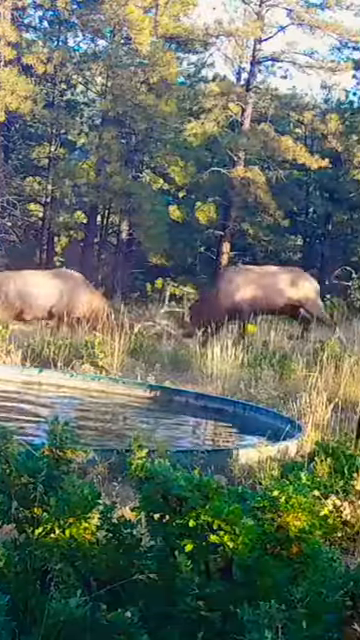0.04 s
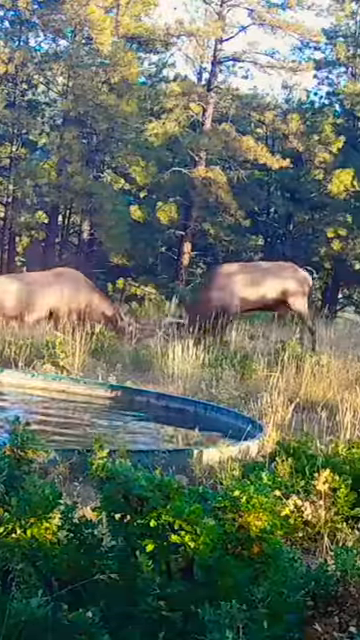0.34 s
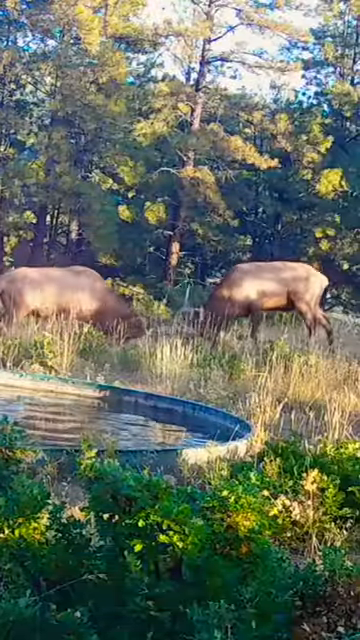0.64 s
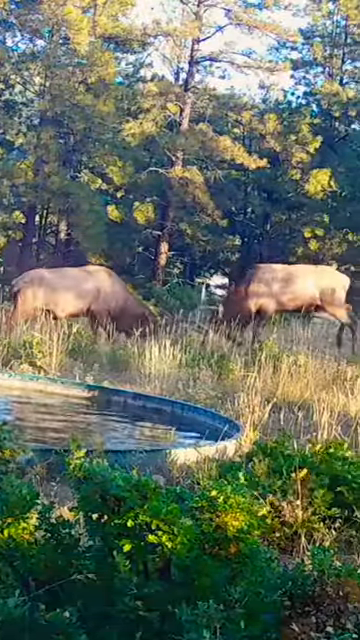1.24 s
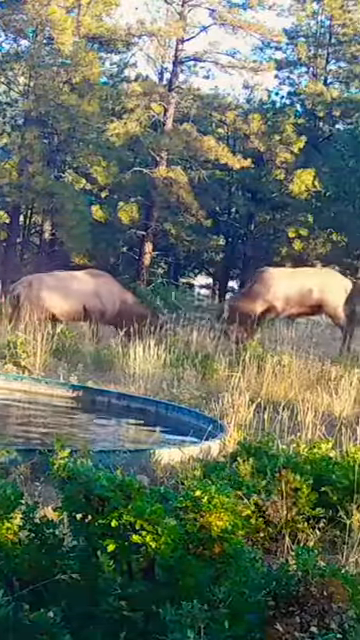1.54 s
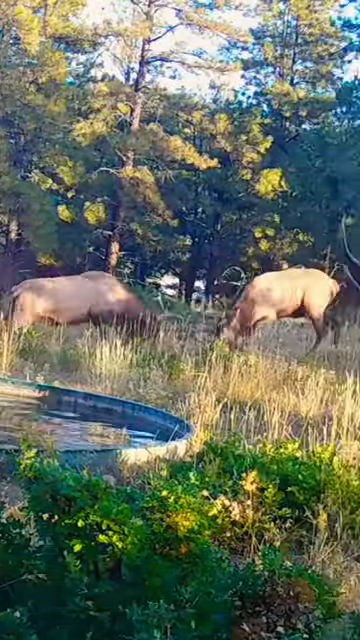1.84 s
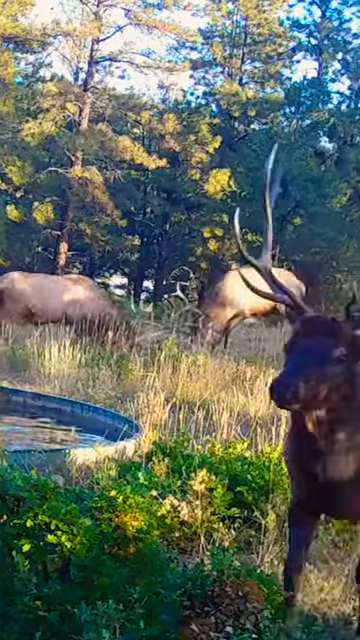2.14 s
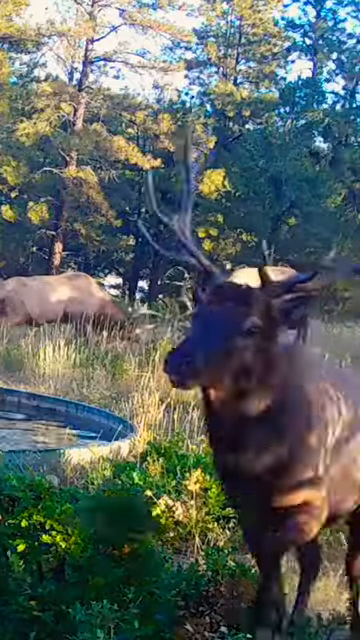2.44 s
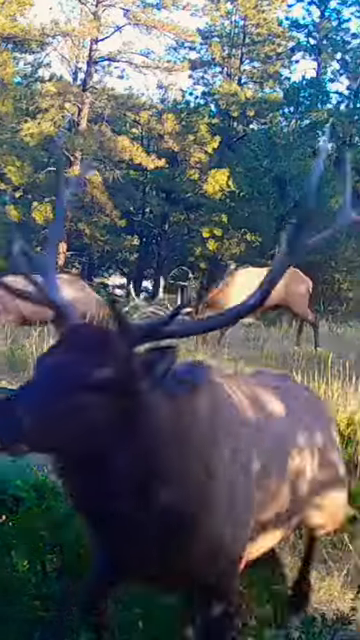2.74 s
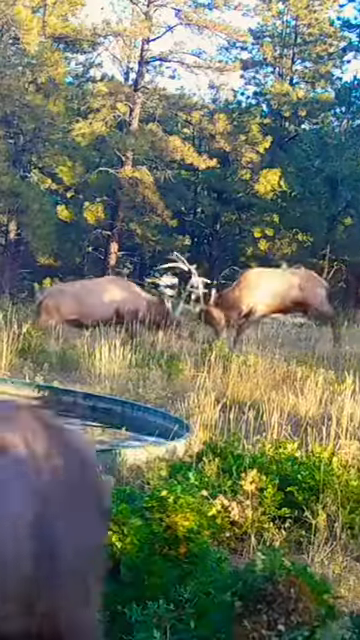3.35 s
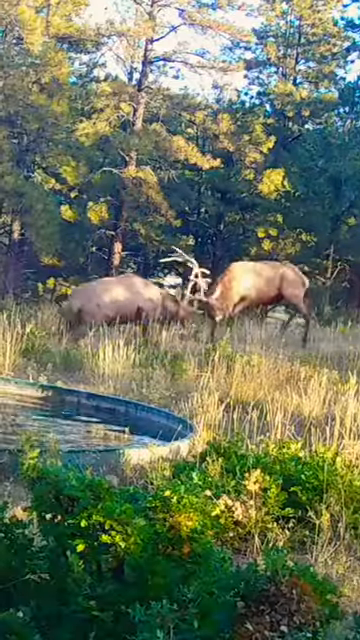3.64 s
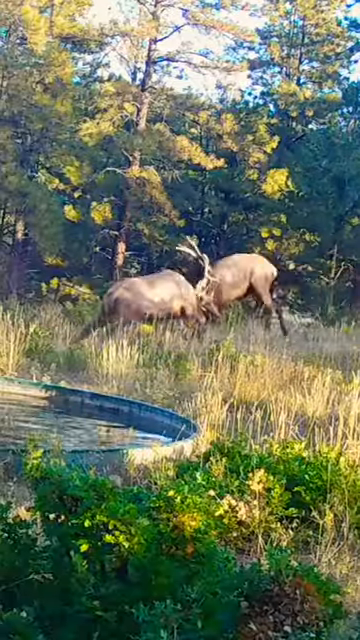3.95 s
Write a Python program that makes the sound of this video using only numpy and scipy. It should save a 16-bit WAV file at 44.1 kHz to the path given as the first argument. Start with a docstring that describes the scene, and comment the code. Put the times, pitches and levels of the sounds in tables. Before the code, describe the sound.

An elk's piercing, hoarse bugle, then distant squeals, clacking antlers and footsteps through brush.

```python
"""A piercing whistle steps down over a hoarse roar and collapses: a bull elk bugles in a forest clearing.
Irregular vocal folds drive his throat and mouth resonances and shake the whistle; the trees echo it.
Sparring bulls farther off squeal and knock antlers, which ring at each contact.
Another walks past with crackling brush and soft hoof thuds. Under it all: still air, a faint low hum."""
import sys
import numpy as np
from scipy import signal
from scipy.fft import rfft, irfft
from scipy.io import wavfile
from scipy.ndimage import map_coordinates

SR = 44100
rng = np.random.default_rng(int(sys.argv[2]) if len(sys.argv) > 2 else 0)


def transcribe(signal):
    """Save signal, clipped to [-1, 1], as a 16-bit WAV file at the path in sys.argv[1]."""
    frames = np.atleast_2d(signal).T
    limited = np.clip(frames, -1, 1)
    pcm = np.round(limited * 32767).astype(np.int16)
    wavfile.write(sys.argv[1], SR, pcm)


N = 176400
TIME_S = np.arange(N) / SR

# Whistle registers; CRACK is the high one giving way: time_s, pitch_hz, h1_db, h2_db, h3_db (harmonics)
WHISTLE_HIGH = [(0, 1922, -15, -27, -45), (.04, 1900, -43, -52, -31), (.066, 1904, -27.5, -25.5, -32),
                (.086, 1946, -17, -23, -25), (.115, 1961, -18, -20.5, -37.5), (.2, 1937, -15.5, -20, -29.5),
                (.285, 1926, -28, -22.5, -26.5), (.335, 1857, -27, -43, -35), (.44, 1827, -33, -37, -29.5),
                (.53, 1866, -25, -41.5, -37.5), (.59, 1850, -30, -41, -35.5), (.62, 1950, -30, -42, -35)]
WHISTLE_CRACK = [(.562, 1828, -45, -44, -38), (.586, 1873, -32, -28, -24), (.605, 2000, -37, -34, -45),
                 (.622, 1960, -38, -35, -47)]
WHISTLE_MIDDLE = [(.57, 1714, -27.5, -61, -54), (.605, 1722, -19.5, -34, -46), (.64, 1718, -14.5, -23, -44),
                  (.675, 1718, -14, -21, -48), (.72, 1698, -15, -19, -46), (.79, 1700, -14.5, -20, -39),
                  (.818, 1669, -18.5, -19.5, -44), (.834, 1562, -13, -31, -39), (.843, 1575, -30, -52, -42)]
WHISTLE_RELAPSE = [(0.835, 1847, -43, -65, -38), (0.855, 1847, -32.5, -47, -29),
                   (0.905, 1833, -46, -50, -36)]
WHISTLE_LOW = [(0.832, 1476, -18.5, -50, -56), (.865, 1471, -27, -56, -60), (.892, 1466, -23, -63, -58),
               (0.909, 1455, -10, -26.5, -35), (.935, 1450, -9.5, -25, -34.5),
               (0.984, 1453, -12.5, -30.5, -38), (1.014, 1486, -14, -34, -34), (1.044, 1499, -29, -41, -60),
               (1.089, 1438, -22.5, -36, -44), (1.13, 1485, -28, -42, -55)]
WHISTLE_COLLAPSE = [(1.118, 1150, -28, -47, -52), (1.131, 1090, -16, -48, -48),
                    (1.135, 1060, -22, -50, -50), (1.139, 1040, -14.5, -52, -48),
                    (1.147, 1010, -14.5, -52, -48), (1.152, 790, -29, -46, -46),
                    (1.156, 620, -16.5, -31, -50), (1.165, 575, -17, -19.5, -48),
                    (1.169, 440, -28, -33, -51), (1.184, 345, -30, -33, -56), (1.195, 300, -44, -48, -63)]
# Spectrum of the whistle's high overtones: freq_hz, base_db
SHRILL_SPECTRUM = [(5800, -35), (6800, -34), (7600, -42), (8600, -50), (9700, -40), (10300, -42),
                   (11400, -41.5), (12000, -56), (13600, -55), (15500, -70)]
# Roar under the whistle: time_s, pitch_hz, throat_db, chest_db
ROAR = [(0, 200.6, -24.5, -47.5), (.17, 206.4, -27.5, -58.5), (.33, 202.4, -35.5, -59.5),
        (.5, 195.9, -32, -57.5), (.6, 195.5, -31, -60), (.75, 189.2, -33, -58), (.87, 190.4, -30.5, -51.5),
        (.95, 180.1, -26, -51), (1.03, 177.7, -29.5, -41.5), (1.08, 171.9, -23, -35.5),
        (1.13, 166.9, -29, -34), (1.163, 156.3, -32.5, -32), (1.18, 123, -35, -81), (1.21, 130, -68, -79)]
# Rasp through the mouth; snarl as the throat tightens: time_s, level_db
RASP = [(0, -33), (.3, -36), (.5, -37.5), (.6, -35), (.7, -36.5), (.81, -32.5), (.835, -30.5),
        (.855, -31.5), (.95, -37.5), (1.03, -32), (1.08, -32), (1.12, -31), (1.15, -32), (1.165, -32.5),
        (1.18, -39), (1.21, -64)]
SNARL = [(.88, -62), (.92, -30), (1, -32), (1.04, -27.5), (1.09, -33), (1.12, -34), (1.145, -35),
         (1.165, -36), (1.18, -60), (1.21, -75)]
# Vocal tract resonances: freq_hz, width_hz, gain_db
THROAT_MODES = [(312, 52, -12), (641, 111, 0), (705, 65, 2), (1077, 103, 6.5), (1530, 114, 3.5)]
MOUTH_MODES = [(2092, 150, 1), (2504, 230, 5.5), (2837, 130, 5), (3350, 310, 0), (3820, 140, -1),
               (4120, 180, 0.5), (4570, 150, -0.5), (5110, 150, -3.5), (5800, 330, 0.5), (6100, 400, -3.5),
               (6530, 230, -4.5), (7110, 190, -4), (8080, 250, -6.5), (8920, 250, -8.5), (9600, 310, -11),
               (10440, 1700, -11.5), (12900, 1400, -21.5)]
SNARL_MODES = [(2320, 67, 7), (2540, 78, 3), (2660, 94.4, -11), (3229, 110, -2), (3470, 67, 10)]
# Still air: freq_hz, density_db
AIR_SPECTRUM = [(12, -37), (20, 3), (70, -9.5), (120, -3), (499, -8.5), (574, -1.5), (923, -14),
                (1710, -10), (2200, -24), (3530, -11), (4670, -24.5), (9400, -21.5), (16000, -71)]
# Tree-line echoes: delay_s, gain_db
ECHOES = [(.27, -24.5), (.5, -39)]
# Squeals of the sparring bulls: time_s, pitch_hz, h1_db, h2_db, h3_db
SQUEAL_1 = [(.18, 1750, -44, -43, -58), (.23, 1736, -24, -31, -49), (.3, 1646, -30.5, -31, -43),
            (.335, 1443, -36, -37, -54), (.365, 1226, -39, -39, -41), (.4, 1014, -33, -38.5, -67),
            (.44, 950, -61, -27, -62)]
SQUEAL_2 = [(.359, 1766, -31, -45, -58), (.415, 1480, -52, -32.5, -54), (.435, 1360, -42, -52, -60)]
SQUEAL_3 = [(1.311, 1730, -46, -54.5, -78), (1.362, 1890, -44, -43, -54), (1.421, 1775, -34, -38.5, -58),
            (1.502, 1760, -33, -40.5, -60), (1.539, 1723, -26.5, -39.5, -49),
            (1.577, 1635, -33.5, -43, -48), (1.6, 1630, -43, -45, -48), (1.655, 1530, -56, -62, -51)]
SQUEAL_3_DROP = [(1.584, 1546, -32, -37, -58), (1.597, 1420, -34.5, -38, -45),
                 (1.624, 1261, -38.5, -46, -48), (1.645, 1071, -39.5, -34.5, -42.5),
                 (1.669, 1020, -33, -36, -38), (1.68, 886, -63, -41, -47), (1.713, 721, -56, -39, -34),
                 (1.722, 667, -62, -54, -32)]
SQUEAL_3_SPLIT = [(1.595, 1400, -56, -51, -53), (1.62, 1360, -54, -41, -43), (1.685, 1336, -60, -50, -48)]
SQUEAL_4 = [(2.08, 1562, -68, -53, -57), (2.115, 1567, -50, -38.5, -44), (2.179, 1504, -56, -35, -46.5),
            (2.255, 1508, -65, -35, -48), (2.275, 1460, -69, -28.5, -54)]
SQUEAL_5 = [(2.275, 1540, -70, -36, -68), (2.321, 1565, -68, -41.5, -49), (2.361, 1630, -64, -40, -51),
            (2.383, 1850, -50, -46, -48), (2.429, 1800, -36.5, -41.5, -40), (2.47, 1765, -42, -42, -44),
            (2.495, 1520, -38, -37.5, -45), (2.541, 1290, -39.5, -45, -64), (2.59, 1190, -43, -45, -64),
            (2.631, 1120, -63, -55, -64), (2.69, 1020, -47, -56, -60), (2.8, 940, -46, -62, -66)]
SQUEAL_6 = [(2.321, 1480, -66, -47, -66), (2.49, 1517, -62, -44.5, -49), (2.71, 1512, -64, -45.5, -51),
            (2.83, 1420, -62, -48, -63)]
# Brush, grass and turf under the walking bull: time_s, level_db
BRUSH_DRAG = [(1.22, -53), (1.28, -48.5), (1.39, -44.5), (1.46, -54), (1.68, -54), (1.84, -66),
              (1.875, -44), (1.95, -55.5), (2.15, -56), (2.25, -47.5), (2.43, -56), (2.52, -35.5),
              (2.61, -29), (2.68, -32), (2.79, -44), (2.91, -40.5), (3.01, -31), (3.15, -42), (3.33, -49),
              (3.375, -42), (3.42, -48), (3.48, -46.5), (3.525, -38.5), (3.56, -45), (3.64, -44),
              (3.675, -41), (3.74, -51), (3.84, -36), (3.92, -48), (4, -36.5)]
GRASS_CRUSH = [(1.25, -60), (1.55, -49), (1.64, -42), (1.78, -47), (1.89, -43), (1.96, -47), (2.4, -51.5),
               (2.48, -51), (2.6, -45), (2.68, -45), (2.78, -40), (3.06, -39), (3.15, -44), (3.42, -49.5),
               (3.55, -49), (4, -55.5)]
TURF_SCUFF = [(1.2, -59), (1.76, -60), (1.9, -49), (2.45, -65), (2.68, -51.5), (2.86, -47), (3.1, -51),
              (3.5, -52), (3.7, -53), (4, -54)]
# Branches along his flank: centre_s, level_db, half_length_s
SWISHES = [(2.857, -24, 0.02), (3.275, -36.5, 0.013), (3.594, -31.5, 0.015), (3.88, -35, 0.013),
           (3.983, -28.5, 0.0053)]
# Leaf crackle: freq_hz, density_db
LEAF_SPECTRUM = [(180, -32), (300, -24), (537, -18), (1170, -2.5), (1640, -14.5), (3760, -0.5), (4700, -8),
                 (6410, 3.5), (7570, -2), (9710, 2), (12900, -5.5), (16000, -14.5)]
# Antler knocks and snapping twigs: start_s, body_drive_db, ring_drive_db, crack_drive_db, decay_s
KNOCKS = [(1.723, -31, -23.5, -33, 0.013), (1.9115, -46, -23, -40, 0.0085),
          (1.9967, -45, -21.5, -30, 0.0016), (2.0111, -26.5, -13.5, -28, 0.007),
          (2.1109, -27.5, -11, -34.5, 0.0058), (2.2957, -51, -28, -29, 0.00096),
          (2.525, -44, -23, -26, 0.006), (2.569, -50, -20, -18, 0.0017),
          (2.7354, -25.5, -16.5, -32.5, 0.014), (3.0439, -22, -14, -25, 0.0059),
          (3.2108, -32, -28.5, -34, .003), (3.2485, -28, -24, -19, 0.00065),
          (3.448, -27.5, -26, -37, 0.0046), (3.4955, -26, -19, -25, 0.0021),
          (3.4983, -25.5, -18, -20.5, 0.0016), (3.5735, -33.5, -25, -24.5, 0.0027),
          (3.871, -22.5, -11.5, -13, 0.0016), (3.942, -45, -30, -26, 0.0023),
          (3.983, -37, -20.5, -18.5, 0.0032)]
# Antler resonances: freq_hz, width_hz, gain_db
ANTLER_MODES = [(1460, 910, -16), (2107, 190, -5), (2750, 270, -1.5), (3037, 476, 0), (3263, 370, -5),
                (4270, 390, -11.5)]
# Hoof falls: start_s, level_db, centre_hz, decay_s
HOOF_FALLS = [(1.73, -34, 284, 0.021), (2.522, -33, 383, 0.013), (2.668, -38, 260, 0.014),
              (2.748, -29.5, 470, 0.013), (3.041, -35.5, 118, 0.026), (3.308, -29, 296, 0.0056),
              (3.622, -24.5, 106, 0.014), (3.623, -31.5, 430, 0.012), (3.715, -35, 890, 0.016)]
# Ground rumble as he passes: time_s, level_db
RUMBLE = [(2.5, -54), (2.95, -51), (3.05, -44.5), (3.2, -53), (3.55, -50.5), (3.65, -40.5), (3.8, -52.5),
          (4, -49)]


def undb(db):
    """Decibels to gain."""
    return 10 ** (np.asarray(db) / 20)


def unit(x):
    """Scale to rms 1."""
    return x / np.sqrt(np.mean(x ** 2) + 1e-18)


def curve(rows, column=1):
    """Table column, linear in time, ends held."""
    rows = np.array(rows)
    return np.interp(TIME_S, rows[:, 0], rows[:, column])


def noise():
    """White noise, spread 1."""
    return rng.standard_normal(N)


def wander(rate_hz):
    """Smooth random motion, rms 1."""
    return unit(np.interp(TIME_S * rate_hz, np.arange(N), noise()))


def band(x, hz, width_hz):
    """One resonance applied twice, for steep skirts."""
    b, a = signal.iirpeak(hz, hz / width_hz, fs=SR)
    return signal.lfilter(b, a, signal.lfilter(b, a, x))


def resonate(x, modes):
    """Ring parallel resonances."""
    return sum(undb(db) * band(x, hz, width_hz) for hz, width_hz, db in modes)


def drift(x, share, rate_hz):
    """Move all resonances together by a small random share."""
    return map_coordinates(x, [np.cumsum(1 + share * wander(rate_hz))], mode="mirror")


def colour(x, spectrum):
    """Impose a smooth spectrum, rms 1."""
    hz, db = np.array(spectrum).T
    bins_hz = np.arange(N // 2 + 1) * SR / N
    gain = undb(np.interp(np.log(bins_hz + 1), np.log(hz), db))
    return unit(irfft(rfft(x) * gain, N))


def grains(rate_hz, spread_db):
    """Random clicks of uneven size, rms 1."""
    hits = rng.random(N) < rate_hz / SR
    return unit(hits * noise() * undb(spread_db * np.minimum(rng.exponential(size=N), 5)))


def burst(start_s, decay_s, attack_s=0.00011):
    """Impact envelope: quick rise, exponential fall."""
    age_s = np.maximum(TIME_S - start_s, 0)
    return (1 - np.exp(-age_s / attack_s)) * np.exp(-age_s / decay_s)


def tone(rows, jitter, flutter_db, shrill=False, fade_s=0.0062, blur_rad=0.19):
    """Whistled note on an unsteady pitch: 6 harmonics, or 8 with brighter overtones if shrill."""
    pitch_hz = curve(rows) * (1 + jitter * wander(700) + .002 * wander(70))
    phase = 2 * np.pi * np.cumsum(pitch_hz) / SR
    fade_in = np.clip((TIME_S - rows[0][0]) / fade_s + .5, 0, 1)
    fade_out = np.clip((rows[-1][0] - TIME_S) / fade_s + .5, 0, 1)
    levels_db = [curve(rows, column) for column in (2, 3, 4)]
    effort_db = 20 * np.log10(undb(levels_db[1]) + undb(levels_db[2]))  # overtones grow with h2 + h3
    if shrill:
        shrill_hz, base_db = np.array(SHRILL_SPECTRUM).T
        levels_db += [np.interp(k * pitch_hz, shrill_hz, base_db) + 0.31 * effort_db for k in range(4, 9)]
    else:
        levels_db += [effort_db - 20.5 - 9 * k for k in range(3)]
    swing_db = flutter_db * wander(90)
    smear_rad = blur_rad * wander(400)
    out = np.zeros(N)
    for k, db in enumerate(levels_db, start=1):
        out += np.sin(k * phase + max(k - 2, 0) * smear_rad) * undb(db + np.sqrt(k) * swing_db)
    return np.sqrt(2) * out * fade_in * fade_out


def whistle():
    """Shrill high note cracks roughly, then steps down through the registers."""
    out = tone(WHISTLE_HIGH, jitter=0.0031, flutter_db=0.93, shrill=True)
    out += tone(WHISTLE_CRACK, jitter=.008, flutter_db=1.0) * unit(band(noise(), 86, 180))
    for rows in (WHISTLE_MIDDLE, WHISTLE_RELAPSE, WHISTLE_LOW):
        out += tone(rows, jitter=0.0027, flutter_db=0.77, shrill=True)
    return out


def roar():
    """Irregular vocal folds ring throat and mouth over a chest tone. Returns roar, throat signal."""
    pitch_hz = curve(ROAR) * (1 + 0.017 * wander(250))
    cycles = np.cumsum(pitch_hz) / SR
    phase = 2 * np.pi * cycles
    pulses = unit(np.diff(np.floor(cycles), prepend=0) * undb(1.1 * wander(200)))
    breath = unit(noise() * (1 + 0.065 * np.cos(phase)))
    folds = 0.29 * pulses + breath
    throat = unit(resonate(folds, THROAT_MODES))
    mouth = resonate(folds * (1 + .8 * np.cos(phase)), MOUTH_MODES)
    rasp = unit(drift(mouth, share=.008, rate_hz=14)) * undb(curve(RASP) + 1.7 * wander(79.9))
    snarl = unit(resonate(noise() * (1 + np.cos(phase)), SNARL_MODES)) * undb(curve(SNARL))
    chest = unit(np.sin(phase) + undb(-4) * np.sin(2 * phase)) * undb(curve(ROAR, 3) + wander(49.6))
    voice = throat * undb(curve(ROAR, 2)) + rasp + snarl + chest
    return voice * (TIME_S < ROAR[-1][0]), throat


def bugle(shake=0.0087):
    """The roaring throat shakes the whistle above it; the call ends in a pitch collapse."""
    voice, throat = roar()
    shaken = whistle() * (1 + shake * throat)
    collapse = tone(WHISTLE_COLLAPSE, jitter=.06, flutter_db=1.5)
    return voice + shaken + collapse


def background(air_db=-51, hum_hz=70.7, hum_db=-52.5):
    """Still air and a faint, wavering low hum."""
    pitch_hz = hum_hz * (1 + 0.0095 * wander(5.62))
    hum = unit(np.sin(2 * np.pi * np.cumsum(pitch_hz) / SR))
    air = colour(noise(), AIR_SPECTRUM)
    return undb(air_db) * air + undb(hum_db + 0.67 * wander(5.35)) * hum


def forest(x, t60_s=0.69, scatter_db=-23, cutoff_hz=4040):
    """Diffuse scatter from the trunks; distinct midrange echoes from the tree line."""
    envelope = burst(0.0057, t60_s / np.log(1000), attack_s=0.0068)
    response = undb(scatter_db) * unit(noise() * envelope) / np.sqrt(N)
    dull = signal.sosfilt(signal.butter(2, cutoff_hz, fs=SR, output="sos"), x)
    scatter = signal.fftconvolve(dull, response)[:N]
    midrange = band(x, 1650, 760)
    echoes = sum(undb(db) * np.pad(midrange, (int(delay_s * SR), 0))[:N] for delay_s, db in ECHOES)
    return scatter + echoes


def squeals(rough_below_hz=1687):
    """Thin arching squeals that fray into hoarseness as their pitch falls."""
    out = np.zeros(N)
    for rows in (SQUEAL_1, SQUEAL_2, SQUEAL_3, SQUEAL_3_DROP, SQUEAL_3_SPLIT,
                 SQUEAL_4, SQUEAL_5, SQUEAL_6):
        slack = np.maximum(1 - curve(rows) / rough_below_hz, 0)
        fray = undb(1) * slack * unit(band(noise(), 294, 610))
        note = tone(rows, jitter=0.0042 + .045 * slack, flutter_db=2.5, blur_rad=.5)
        out += note * (1 + fray) / np.sqrt(1 + 2 * slack)
    return out


def brush():
    """Leaves crackle and swish along the walking bull; dry grass crunches, turf scuffs."""
    drag_power = undb(curve(BRUSH_DRAG) + 1.8 * wander(55)) ** 2
    swish_power = sum(undb(db) ** 2 * np.exp(-((TIME_S - centre_s) / half_s) ** 2)
                      for centre_s, db, half_s in SWISHES)
    leaves = colour(grains(9000, spread_db=1.0), LEAF_SPECTRUM) * np.sqrt(drag_power + swish_power)
    stems = grains(2500, spread_db=2.4)
    grass = unit(band(stems, 1750, 5650)) * undb(curve(GRASS_CRUSH) + 1.8 * wander(50))
    turf = unit(band(noise(), 246, 380)) * undb(curve(TURF_SCUFF) + 2.5 * wander(40))
    return leaves + grass + turf


def antler_knocks(tick=5.7, tail_db=-20, tail_s=0.0088):
    """Each contact, a tick plus short chatter, drives a dull body, the antler's ring and a crack."""
    drives = np.zeros((3, N))
    for start_s, body_db, ring_db, crack_db, decay_s in KNOCKS:
        contact = noise() * (burst(start_s, decay_s) + undb(tail_db) * burst(start_s, tail_s))
        contact[int((start_s + .0005) * SR)] += tick
        drives += np.outer(undb([body_db, ring_db, crack_db]), contact)
    body = undb(7) * band(drives[0], 850, 1400)
    ring = undb(8) * resonate(drives[1], ANTLER_MODES)
    crack = undb(4.5) * band(drives[2], 6800, 5700)
    return body + ring + crack


def hooves():
    """Soft thuds on turf; ground rumble from the passing weight."""
    thuds = np.zeros(N)
    for start_s, db, hz, decay_s in HOOF_FALLS:
        thuds += undb(db) * unit(band(noise(), hz, 1.56 * hz)) * burst(start_s, decay_s, attack_s=0.0019)
    rumble = unit(band(noise(), 32, 55)) * undb(curve(RUMBLE))
    return thuds + rumble


def scene():
    """All the animals in the clearing, heard from one spot; mono."""
    animals = bugle() + squeals() + brush() + antler_knocks() + hooves()
    return (animals + background() + forest(animals))[None, :]


def record(dry):
    """Steep low-pass cuts the top treble."""
    cutoff_hz = 16100
    return signal.sosfilt(signal.ellip(10, .2, 80, cutoff_hz, fs=SR, output="sos"), dry)


dry = scene()
out = record(dry)
transcribe(out)
```